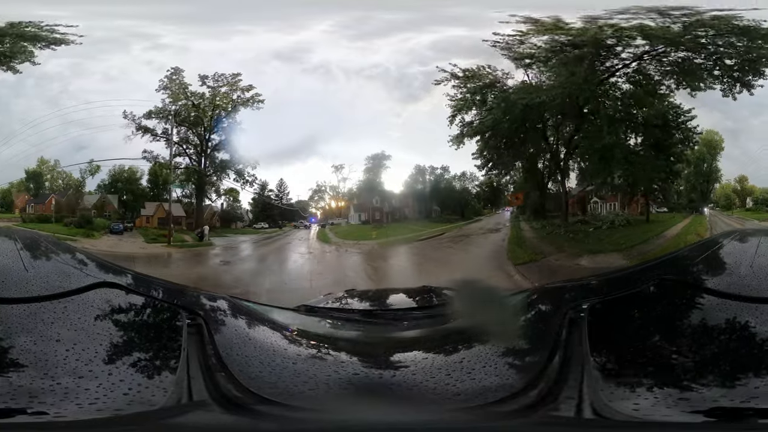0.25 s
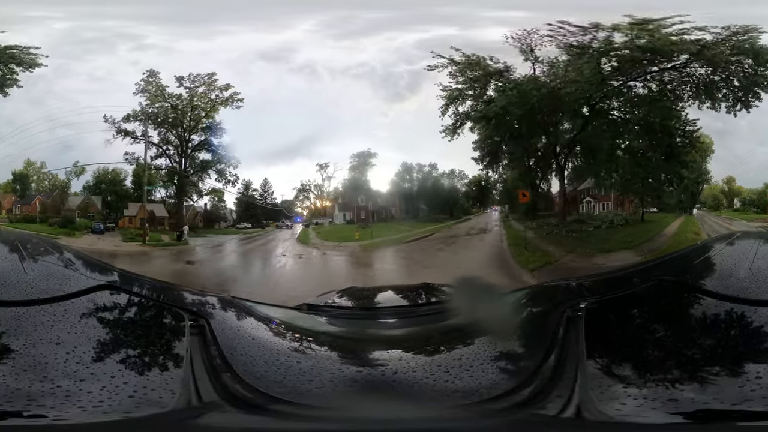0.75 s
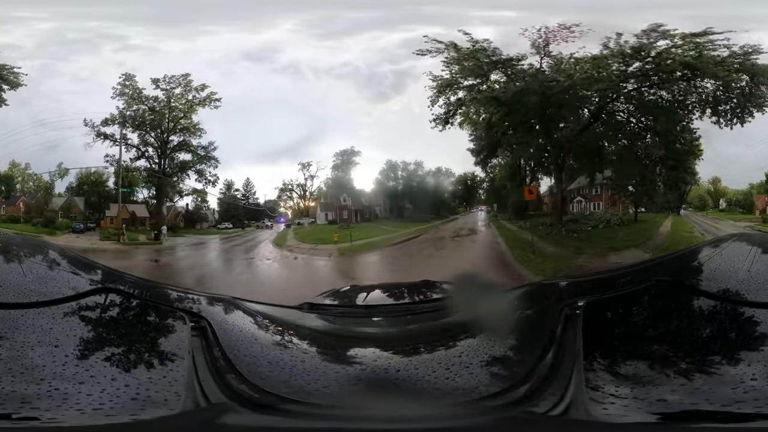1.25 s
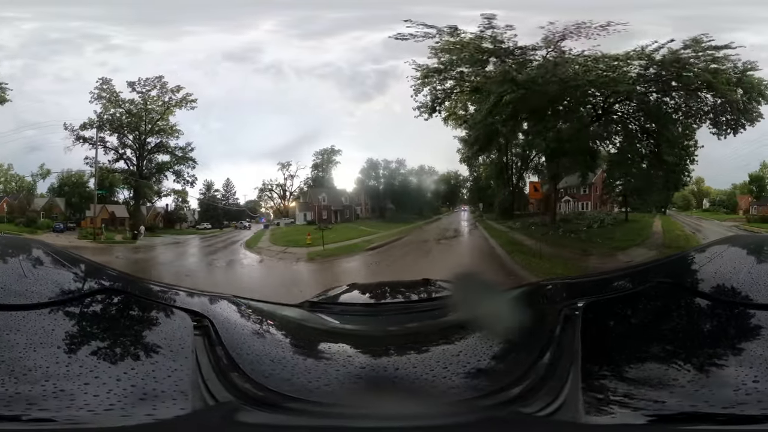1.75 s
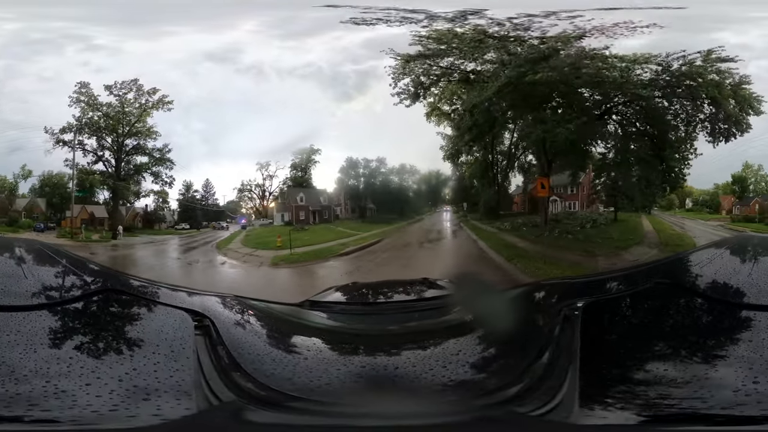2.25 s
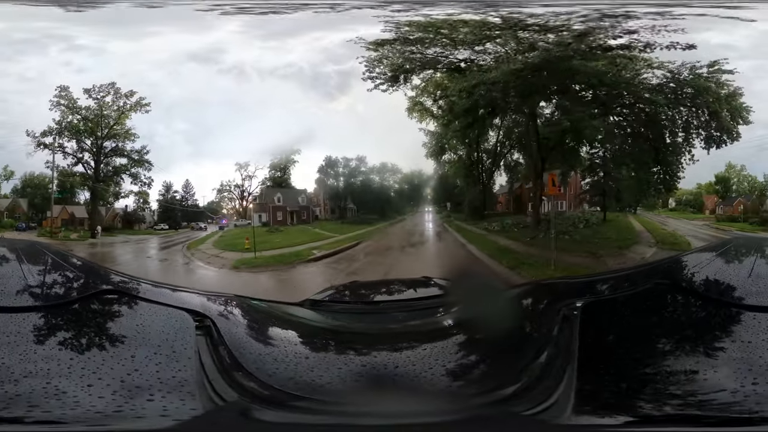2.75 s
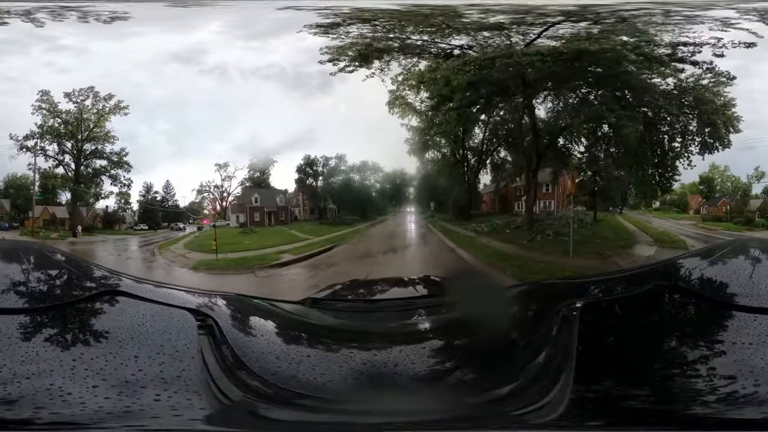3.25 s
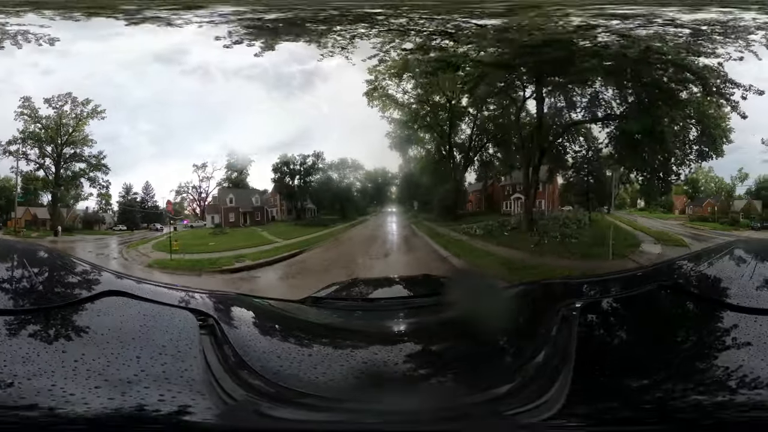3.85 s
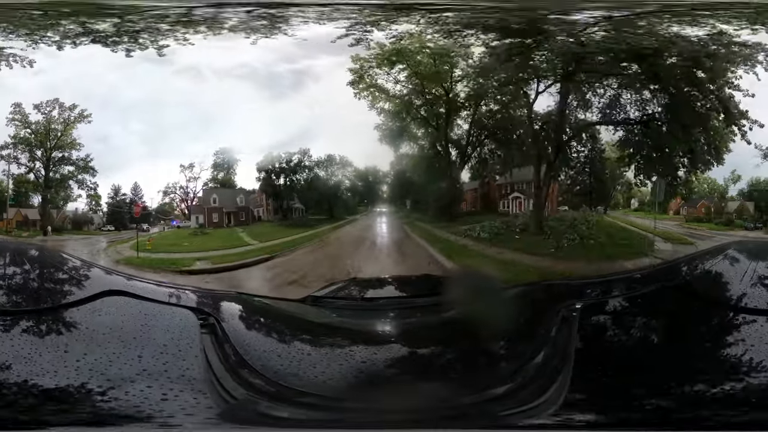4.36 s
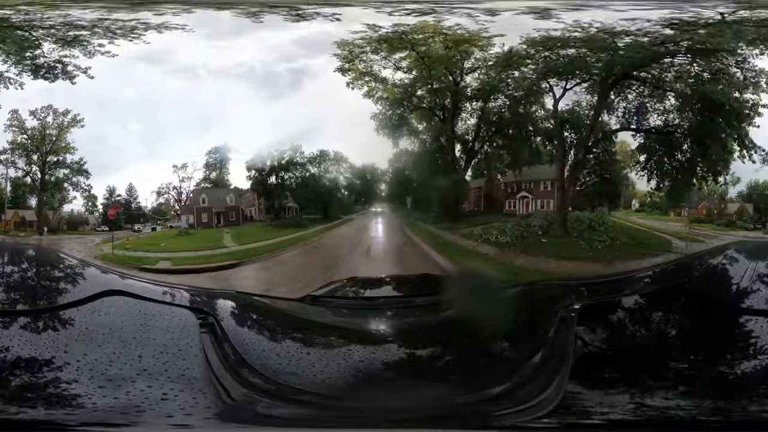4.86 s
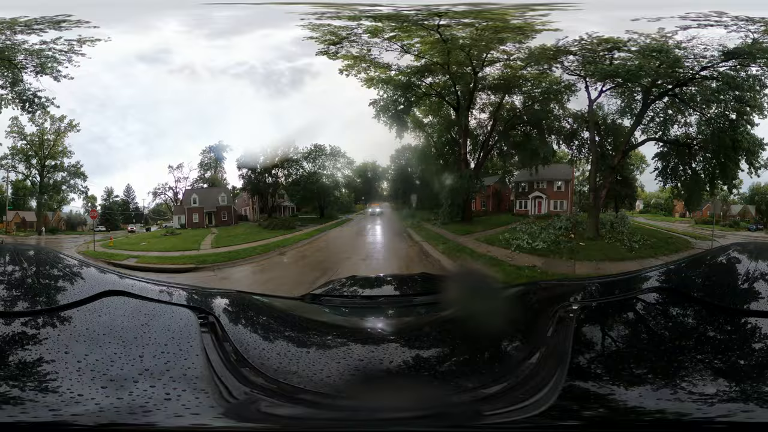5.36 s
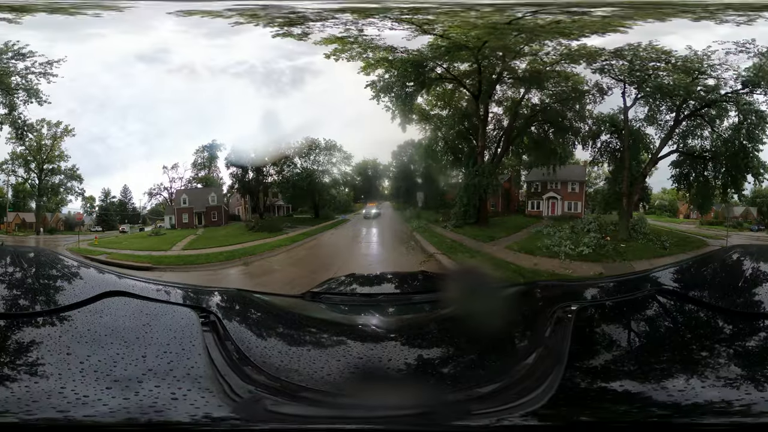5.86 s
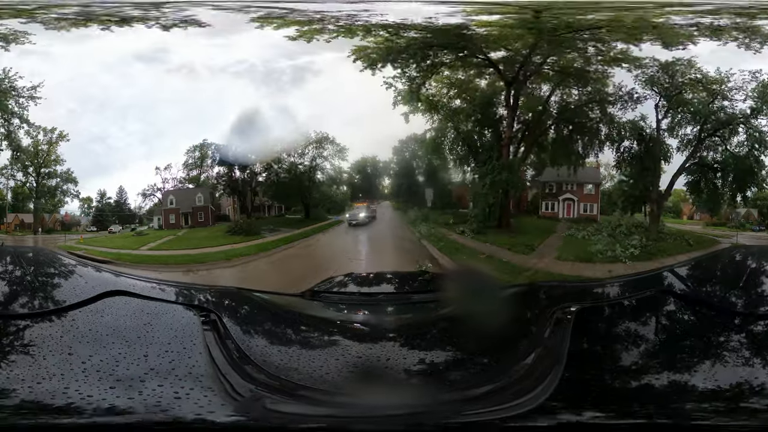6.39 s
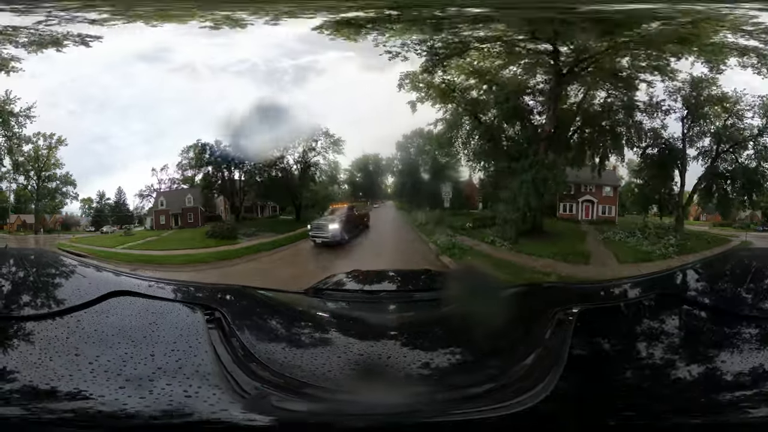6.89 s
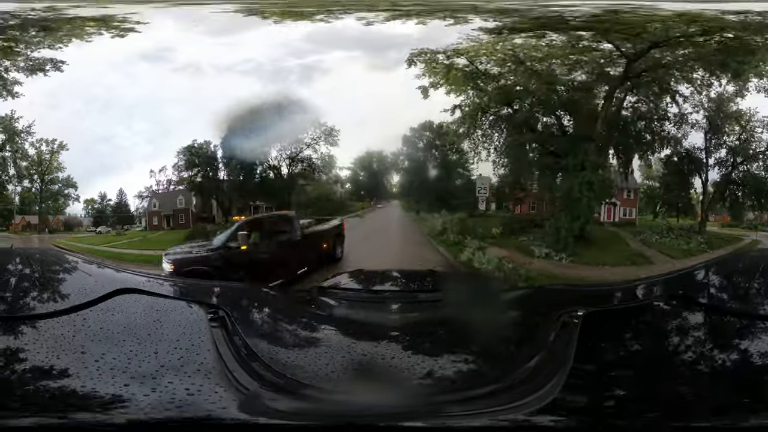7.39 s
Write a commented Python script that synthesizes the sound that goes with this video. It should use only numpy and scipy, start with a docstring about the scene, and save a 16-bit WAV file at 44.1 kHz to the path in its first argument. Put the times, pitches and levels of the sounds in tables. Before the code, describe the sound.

A microphone outside a car picks up lumpy low wind, tire rumble and fine wet hiss. Rounding a corner, the car hits bumps: fittings clank, the body thuds, booms and rattles, and drops tick nearby. The engine then pulls away with a low climbing drone, a faint squeak and another knock follow, puddles swish, and finally an oncoming pickup closes in with tread roar, exhaust growl and a surge of spray.

```python
"""A microphone rides on the outside of a car as it rounds a corner and speeds up along a wet street.
At the corner fittings clank, drops tick close by on the housing and bumps thud, boom and rattle the body;
an oncoming pickup's swish comes up from afar. The engine then pulls away, trim squeaks and puddles splash;
near the end the pickup is close, with tread roar, exhaust and spray. Throughout, wind buffets the port
over tyre rumble, hiss and spray: shaped noise; blows ring decaying modes, and engines are summed sines."""
import sys
import numpy as np
from scipy import signal
from scipy.fft import rfft, irfft, next_fast_len
from scipy.io import wavfile
from scipy.ndimage import uniform_filter1d

SR = 44100
rng = np.random.default_rng(int(sys.argv[2]) if len(sys.argv) > 2 else 0)


def wav_out(sig):
    """Save sig, one row per channel (or a flat mono array), as 16-bit PCM at SR to the path in sys.argv[1]."""
    wavfile.write(sys.argv[1], SR, np.round(np.clip(np.atleast_2d(sig).T, -1, 1) * 32767).astype(np.int16))


N = 336483
T = np.arange(N) / SR   # time [s]


def from_db(db):
    """Decibels to gain."""
    return 10 ** (np.asarray(db) / 20)


def rms_one(x):
    """Scale to unit power."""
    return x / np.sqrt(np.mean(x ** 2) + 1e-20)


def in_time(rows):
    """Each column of a curve at every sample."""
    s, *columns = np.transpose(rows)
    return [np.interp(T, s, c) for c in columns]


def colour(x, shape):
    """Give a steady signal a spectrum, cut by 90 dB outside its ends; unit power."""
    hz, db = np.transpose(shape)
    size = next_fast_len(N)
    f = np.maximum(np.fft.rfftfreq(size, 1 / SR), 1)
    gain = from_db(np.interp(np.log(f), np.log(hz), db, left=-90, right=-90))
    return rms_one(irfft(rfft(x, size) * gain, size)[:N])


def noise(shape):
    """Coloured noise of unit power."""
    return colour(rng.standard_normal(N), shape)


def drift(rate):
    """Random wander of unit power, with `rate` new values a second joined by straight lines."""
    knots = rng.standard_normal(4096)
    return rms_one(np.interp(T * rate, np.arange(len(knots)), knots))


def steady(x, span_s):
    """Hold the power of a noise even over spans of the given length."""
    return x / np.sqrt(uniform_filter1d(x ** 2, max(int(span_s * SR), 2)) + 1e-9)


def dull(x, hz):
    """Second-order low-pass."""
    sos = signal.butter(2, min(hz, .45 * SR), fs=SR, output="sos")
    return signal.sosfilt(sos, x + 1e-18)


def band(x, hz, width):
    """A band of a signal, through two resonators in a row; unit power."""
    peak = signal.iirpeak(hz, hz / width, fs=SR)
    return rms_one(signal.lfilter(*peak, signal.lfilter(*peak, x)))


def ring(x, hz, t60):
    """A unit click sets a decaying sine of initial height 1 ringing."""
    r = np.exp(-np.log(1000) / (t60 * SR))
    w = 2 * np.pi * hz / SR
    return signal.lfilter([0, np.sin(w)], [1, -2 * r * np.cos(w), r * r], x + 1e-18)


def resonate(x, peaks):
    """Lift or lower narrow bands."""
    for hz, width, db in peaks:
        x = x + (from_db(db) - 1) * signal.lfilter(*signal.iirpeak(hz, hz / width, fs=SR), x)
    return x


def click(s):
    """A single unit sample at s."""
    return np.arange(N) == round(s * SR)


def fade(s, t60):
    """An envelope that jumps to 1 at s and dies away."""
    return (T >= s) * np.exp(-np.log(1000) * np.clip((T - s) / t60, 0, 10))


def rise(s, rise_s):
    """An envelope that climbs from 0 at s to 1."""
    return np.clip((T - s) / rise_s, 0, 1)


def burst(s, rise_s, t60):
    """An envelope that climbs from s, then dies away."""
    return rise(s, rise_s) * np.exp(-np.log(1000) * np.clip((T - s - rise_s) / t60, 0, 10))


def swell(s, half_length):
    """A bell-shaped envelope that peaks at s."""
    return np.exp(-.5 * ((T - s) / half_length) ** 2)


def swells_db(rows):
    """Sum of passing lifts or dips in level."""
    return sum(db * swell(s, half_length) for s, db, half_length in rows)


def droplets(per_s, size_db):
    """Clicks of uneven size at random moments; unit power."""
    sizes = from_db(size_db * np.minimum(rng.exponential(1, N), 5)) * rng.choice([-1, 1], N)
    return rms_one(sizes * (rng.random(N) < per_s / SR))


def drone(hz, orders, waver_db, jitter):
    """A low tone of wandering pitch whose overtones each flutter on their own."""
    phase = 2 * np.pi * (rng.random() + np.cumsum(hz * (1 + jitter * drift(22.01))) / SR)
    tones = sum(from_db(db + waver_db * drift(16)) * np.sin(k * phase) for k, db in orders)
    return np.sqrt(2) * tones


# the car rolls round the corner, then gathers pace: (time [s], share of reference speed)
CAR_SPEED = [(0, 0.44), (1.7, 0.51), (3.1, 0.62), (4.2, 0.67), (5.3, 0.84), (7.63, 0.94)]


def speed_db(law):
    """Level of a sound that grows with the car's speed."""
    reference_db, doubling_db = law
    speed, = in_time(CAR_SPEED)
    return reference_db + doubling_db * np.log2(np.maximum(speed, 1e-2))


# faint squeaks: (time [s], level [dB], pitch [Hz], width [Hz], t60 [s])
TRIM_SQUEAKS = [(2.745, -52, 2880, 90, 1.3), (6.051, -62, 12100, 453, 0.75)]


def squeaks():
    """Trim rubs in thin, fading squeaks: narrow bands of noise."""
    rub = rng.standard_normal(N)
    out = np.zeros(N)
    for s, db, hz, width, t60 in TRIM_SQUEAKS:
        squeak = steady(band(rub, hz, width), span_s=.03)
        out += from_db(db) * fade(s, t60) * squeak
    return out


# approach: (time [s], swish level [dB], first notch of the road reflection [Hz], tread roar level [dB])
TRUCK_APPROACH = [(1.5, -65, 740, -84), (3.5, -43.5, 756, -90), (5.2, -39, 766, -70),
                  (5.9, -37.5, 880, -79), (6.25, -38.5, 1010, -55), (6.55, -36, 1150, -46),
                  (6.8, -36, 1420, -38), (6.98, -37.5, 1800, -35.5), (7.3, -42, 3140, -34.5),
                  (7.63, -37.5, 4230, -38)]
# spectra of its swish and its roar: (frequency [Hz], relative density [dB per Hz])
TRUCK_SWISH_SPECTRUM = [(150, 9), (400, 2.5), (800, -1.5), (1100, 2), (1450, 2.5), (2000, 0.5), (3000, -10),
                        (4000, -11), (5500, -21.5), (9000, -50), (13000, -60)]
TRUCK_ROAR_SPECTRUM = [(200, 2), (400, -6.5), (600, -1.5), (850, -3), (1200, -2.5), (1500, -7.5),
                       (2500, -10), (5000, -35)]
# its exhaust drops in pitch as it passes: (time [s], firing rate [Hz], level [dB])
TRUCK_FIRING = [(6.6, 76, -51), (7.05, 71.94, -28.5), (7.3, 63.04, -27.5), (7.63, 58.5, -28)]
# overtones of that exhaust: (multiple of the firing rate, relative level [dB])
TRUCK_ORDERS = [(1, -1.5), (2, -9.5), (2.5, -10), (3, -13)]


def truck(reflection=0.86, rough_db=0.1):
    """Its swish also arrives off the wet road; the lag shrinks as it nears, so the notches sweep up."""
    swish_db, notch_hz, roar_db = in_time(TRUCK_APPROACH)
    direct = noise(TRUCK_SWISH_SPECTRUM)
    # a lag of half a period cancels the first notch
    mirrored = np.interp(T - .5 / notch_hz, T, direct)
    swish = from_db(swish_db) * rms_one(direct + reflection * mirrored)
    # the tread's own roar and the exhaust stand out only close by
    roar = from_db(roar_db + rough_db * drift(45)) * noise(TRUCK_ROAR_SPECTRUM)
    exhaust_hz, exhaust_db = in_time(TRUCK_FIRING)
    exhaust = from_db(exhaust_db) * drone(exhaust_hz, TRUCK_ORDERS, waver_db=2.5, jitter=0.0196)
    return swish + roar + exhaust


# spray of the car: (level at reference speed [dB], gain per doubling of speed [dB])
SPRAY_BY_SPEED = (-44, 6.7)
# passing swells of its hiss, the last as the pickup nears: (time [s], lift [dB], half length [s])
SPRAY_SWELLS = [(2.1, 2, 0.19), (5.09, 6, 0.22), (5.856, 3.5, 0.23)]
# the car's own hiss dips, then gives way as the pickup comes near:
#   (time [s], tread change [dB], spray change [dB], half length [s])
HISS_DIPS = [(2.562, -1.5, -3, 0.11), (6.65, -6.5, -2.5, 0.54)]
# the pickup's spray comes into range, then surges as it draws level: (time [s], level [dB])
TRUCK_SPRAY_LEVEL = [(5.9, -55), (6.6, -47.5), (6.95, -44.5), (7.01, -37.5), (7.1, -37.5), (7.2, -39.5),
                     (7.63, -39.5)]
# spectra of the two sprays: (frequency [Hz], relative density [dB per Hz])
TRUCK_SPRAY_SPECTRUM = [(1200, -21), (2200, -2), (3300, 1), (4500, -1.5), (5600, 1), (7000, -5.5),
                        (9000, -13), (11500, -30), (15000, -36)]
SPRAY_SPECTRUM = [(800, -22), (1800, 0), (2800, 3.5), (3600, 1), (4500, -3), (6000, 0), (7500, -6),
                  (9000, -12.5), (10500, -22), (11500, -30), (15000, -38.5)]


def spray(per_s=2500, size_db=3.5, grain=0.67, surge_db=.5):
    """Fine mist from both vehicles hisses, with countless droplets of uneven size in it."""
    car_db = speed_db(SPRAY_BY_SPEED) + swells_db(SPRAY_SWELLS)
    car_db += swells_db((s, db, half_length) for s, _, db, half_length in HISS_DIPS)
    truck_db, = in_time(TRUCK_SPRAY_LEVEL)
    out = np.zeros(N)
    for db, spectrum in ((car_db, SPRAY_SPECTRUM), (truck_db, TRUCK_SPRAY_SPECTRUM)):
        water = colour(rng.standard_normal(N) + grain * droplets(per_s, size_db), spectrum)
        out += from_db(db + surge_db * drift(25)) * water
    return out


# tyres cutting through puddles: (time [s], level [dB], half length [s], band centre [Hz])
PUDDLE_SPLASHES = [(4.703, -41.5, 0.037, 4420), (4.864, -46, 0.09, 3698), (5.038, -40.5, 0.025, 3195),
                   (5.156, -36.5, 0.05, 3700), (5.31, -40, 0.074, 3580)]


def puddles(sharpness=0.43, churn_db=2.0, grain=1.6):
    """Standing water swishes under a tyre in a churning swell full of flung droplets."""
    splash = rng.standard_normal(N) + grain * droplets(per_s=2100, size_db=2.5)
    water = colour(splash, SPRAY_SPECTRUM) * from_db(churn_db * drift(120))
    out = np.zeros(N)
    for s, db, half_length, hz in PUDDLE_SPLASHES:
        out += from_db(db) * swell(s, half_length) * band(water, hz, hz / sharpness)
    return out


# drops on the microphone housing: (time [s], level before the common trim [dB], band centre [Hz])
HOUSING_DROPS = [(0.583, -26.5, 5070), (0.596, -32, 5400), (0.622, -31, 6000), (0.6284, -23, 4800),
                 (0.637, -31, 7200), (1.039, -31, 4800), (1.212, -29, 2100), (2.112, -25, 6500),
                 (2.123, -31, 3500), (2.24, -30, 6000), (2.296, -31, 5000), (2.351, -33, 4000),
                 (2.695, -33, 7600), (2.8365, -22, 7500), (3.919, -22.5, 4060), (5.7152, -27, 5800),
                 (5.82, -19, 5260), (6.4746, -23.5, 4514), (6.827, -24, 5410)]


def drops(t60=0.025, sharpness=1.3, trim_db=-11, rise_s=0.0012):
    """Each drop splats as a brief, broad tick around its own pitch."""
    out, splat = np.zeros(N), rng.standard_normal(N)
    for s, db, hz in HOUSING_DROPS:
        tick = steady(band(splat, hz, hz / sharpness), span_s=0.0015)
        out += from_db(db + trim_db) * burst(s, rise_s, t60) * tick
    return dull(dull(out, hz=8950), hz=9500)


# engine pulling away: (time [s], firing rate [Hz], level [dB])
ENGINE_PULL = [(2.65, 46, -47), (2.9, 52.98, -26), (3.2, 59.04, -23.5), (3.6, 63.35, -24),
               (3.95, 69.58, -26.5), (4.8, 76.35, -27), (5.15, 82.15, -37), (5.7, 80.16, -35.5),
               (6.2, 79, -28), (6.6, 80.16, -34), (7.63, 79, -36)]
# its overtones: (multiple of the firing rate, relative level [dB])
FIRING_ORDERS = [(1, -0.5), (1.5, -13), (2, -18), (3, -18), (4, -21)]


def engine(intake_db=-18, intake_hz=385, intake_width_hz=130):
    """The exhaust drones and the intake growls as the throttle opens; both ease off after the climb."""
    hz, db = in_time(ENGINE_PULL)
    exhaust = drone(hz, FIRING_ORDERS, waver_db=0.7, jitter=0.0049)
    # air rushes in only on the positive half of the exhaust wave
    gulps = np.maximum(exhaust, 0)
    intake = rms_one(gulps * band(rng.standard_normal(N), intake_hz, intake_width_hz))
    return from_db(db) * (exhaust + from_db(intake_db) * intake)


# metal fittings clanking: (time [s], clatter level [dB], clatter length [s], low-pass [Hz],
#   wash relative to clatter [dB], wash t60 [s], ring strike relative to clatter [dB])
FITTING_CLANKS = [(0.01, -27.5, 0.0031, 11000, -12, .15, -42), (0.028, -35.5, 0.002, 10100, -15, 0.11, -32),
                  (0.926, -22, 0.005, 1700, -20, .1, -29), (0.9337, -25.5, 0.0084, 4600, -7, 0.4, -23),
                  (0.964, -43, 0.0037, 11000, -5, 0.54, -33), (2.836, -38.5, 0.003, 10000, -8, 1, -28),
                  (3.441, -34, 0.0068, 8950, -14, 0.32, -33), (3.446, -27, 0.0071, 9500, -10, 0.7, -20),
                  (3.464, -33, 0.0051, 2200, -19, 0.26, -33), (3.545, -46, 0.009, 8000, -4, .2, -7)]
# ringing modes of the fittings: (frequency [Hz], relative level [dB], t60 [s])
FITTING_MODES = [(1757, 18, 0.085), (2410, 1, .09), (3670, 11, 0.06), (4320, -3, 0.1), (5300, -8, 0.2),
                 (6120, 7, 0.3), (6930, -4, 0.15), (7100, -2, 0.27), (7900, -5, 0.2)]
# spectrum of the clatter: (frequency [Hz], relative density [dB per Hz])
CLANK_SPECTRUM = [(300, 8), (900, 2), (2000, 0.5), (2700, 1), (3700, -4), (4700, -2), (6500, 1.5),
                  (9300, -2.5), (11500, -15), (15000, -15)]


def clanks(rise_s=0.0022, stop_t60=0.0078, shimmer_db=2.0, ring_width_hz=110, lift_db=5):
    """A short noise burst of contacts, then ringing metal and a fading wash lifted at the same modes."""
    mode_peaks = [(hz, ring_width_hz, lift_db) for hz, _, _ in FITTING_MODES]
    clatter = rms_one(resonate(noise(CLANK_SPECTRUM), mode_peaks))
    clatter *= from_db(shimmer_db * drift(150))
    out, strikes = np.zeros(N), np.zeros(N)
    for s, db, length, hz, wash_db, wash_t60, ring_db in FITTING_CLANKS:
        contact = np.maximum((T >= s) & (T < s + length), fade(s + length, stop_t60))
        wash = from_db(wash_db) * fade(s, wash_t60)
        envelope = rise(s, rise_s) * np.maximum(contact, wash)
        out += dull(from_db(db) * envelope * clatter, hz)
        strikes += dull(from_db(db + ring_db) * click(s), hz)
    return out + sum(from_db(db) * ring(strikes, hz, t60) for hz, db, t60 in FITTING_MODES)


# jolts that rock the whole body, heard in rattle and boom:
#   (time [s], boom level [dB], boom pitch [Hz], boom t60 [s], rattle level [dB])
BODY_JOLTS = [(0.932, -16.5, 88.04, 0.28, -29), (1.068, -17.5, 93, .14, -37),
              (1.114, -21.5, 89.8, 0.29, -52), (1.955, -24, 110.3, 0.48, -26.5),
              (2.085, -19, 103.6, 0.49, -28), (2.123, -10, 100.1, 0.049, -38),
              (2.213, -16, 99.6, 0.18, -30), (2.272, -18, 95, 0.19, -31.5),
              (2.347, -15.5, 88.5, 0.3, -33.5), (2.44, -17.5, 86.9, 0.39, -54), (2.495, -18, 85, 0.18, -55)]
# spectrum of the rattle: (frequency [Hz], relative density [dB per Hz])
RATTLE_SPECTRUM = [(100, 10), (180, 12.5), (320, 5.5), (450, 4), (600, -4), (760, -7.5), (930, -10),
                   (1200, -8), (1600, -17.5), (3500, -24.5), (6000, -36)]
# resonances of the loose parts: (frequency [Hz], width [Hz], lift [dB])
LOOSE_PART_PEAKS = [(310, 50, 1.5), (545, 40, 0), (740, 78, 7), (1150, 67, 3.5), (1470, 50, 9.5),
                    (1800, 117, 4)]


def rattle(rise_s=0.0085, t60=0.71, shake_db=2.5, shakes_per_s=120):
    """Each jolt sets loose parts chattering in a run of small, uneven contacts."""
    power = sum((from_db(db) * burst(s, rise_s, t60)) ** 2 for s, *_, db in BODY_JOLTS)
    contacts = colour(droplets(per_s=1500, size_db=3.0), RATTLE_SPECTRUM)
    contacts = steady(resonate(contacts, LOOSE_PART_PEAKS), span_s=0.023)
    return np.sqrt(power) * rms_one(contacts * from_db(shake_db * drift(shakes_per_s)))


# overtones of the body boom: (multiple of its pitch, relative level [dB])
BODY_BOOM_ORDERS = [(1, -0.5), (2, -20)]


def boom(rise_s=0.013, sag_hz_per_s=9.8):
    """After each jolt the body booms, sagging in pitch as it dies away."""
    out = np.zeros(N)
    for s, db, hz, t60, _ in BODY_JOLTS:
        pitch = hz - sag_hz_per_s * np.clip(T - s, 0, t60)
        tone = drone(pitch, BODY_BOOM_ORDERS, waver_db=2.5, jitter=0.0624)
        out += from_db(db) * burst(s, rise_s, t60) * tone
    return out


# suspension blows: (time [s], blow strength before the trims [dB], low-pass [Hz],
#   knock level [dB], knock pitch [Hz])
SUSPENSION_BLOWS = [(0.814, -19, 380, -33, 330), (0.927, -14, 650, -7.5, 323),
                    (0.9408, -10.5, 380, -16, 558), (0.963, -23, 550, -31, 544),
                    (0.976, -26, 700, -33, 680), (0.988, -30, 600, -34, 500), (1.029, -22, 500, -34, 563),
                    (1.072, -25, 400, -29, 527), (1.958, -19, 850, -22.5, 694),
                    (1.97, -21.5, 350, -31, 330), (1.985, -19, 750, -27, 550),
                    (2.014, -16.5, 900, -24, 726), (2.04, -28, 900, -38, 560), (2.078, -22, 900, -36, 450),
                    (2.089, -16.5, 606, -22, 312), (2.108, -29, 1900, -34, 630),
                    (2.126, -27, 1500, -33, 1150), (2.193, -32, 1200, -34, 1040),
                    (2.226, -33, 1200, -48, 520), (2.274, -31, 900, -37, 780),
                    (2.294, -29, 1400, -34, 1150), (2.319, -30, 1200, -37, 780),
                    (2.367, -22, 800, -34, 644), (2.388, -27, 900, -42, 790), (2.426, -24, 500, -29, 340),
                    (3.454, -19.5, 1200, -31, 720), (3.466, -27, 1100, -32, 443)]
# body panel modes: (frequency [Hz], relative level [dB], t60 [s])
PANEL_MODES = [(98.2, -1, 0.55), (135.4, -10.5, 0.48), (186, -3, 0.11), (242, -4, 0.25), (303, 1, 0.066),
               (334, -10.5, 0.093), (471, -10, 0.1), (553, -18.5, 0.35), (748, -6, 0.092),
               (850, -16, 0.043), (1100, -7.5, 0.037), (1500, -24, 0.021)]
# spectrum of the crunch: (frequency [Hz], relative density [dB per Hz])
CRUNCH_SPECTRUM = [(90, 4), (300, -3), (750, 4), (950, 7), (1300, 0), (2000, -15), (4000, -28)]


def thuds(crunch_db=-14, ring_db=-4.5, crunch_t60=.055, knock_rise_s=.0045, knock_t60=.03):
    """Each blow knocks at the pitch of the part it hits, rings the panels and shakes loose a dull crunch."""
    blows, crunch, knocks = np.zeros(N), np.zeros(N), np.zeros(N)
    grit = steady(noise(CRUNCH_SPECTRUM), span_s=0.01)
    for s, db, hz, knock_db, knock_hz in SUSPENSION_BLOWS:
        blows += dull(from_db(db) * click(s), hz)
        crunch += dull(from_db(db) * fade(s, crunch_t60) * grit, hz)
        knock = np.sin(2 * np.pi * knock_hz * (T - s))
        knocks += from_db(knock_db) * burst(s, knock_rise_s, knock_t60) * knock
    panels = np.zeros(N)
    for k, (hz, db, t60) in enumerate(PANEL_MODES):
        # neighbouring modes ring in opposite polarity
        panels += (-1) ** k * from_db(db) * ring(blows, hz, t60)
    return from_db(ring_db) * panels + from_db(crunch_db) * crunch - knocks


# rumble, its extra upper part, and tread: (level at reference speed [dB], gain per doubling of speed [dB])
RUMBLE_BY_SPEED = (-26.5, 6.08)
RUMBLE_TOP_BY_SPEED = (0.73, 3.6)   # added to the rumble's own law above the split
TREAD_BY_SPEED = (-44.5, 1.54)
# coarser asphalt swells the rumble: (time [s], lift [dB], half length [s])
COARSE_ROAD = [(3.165, 1, 0.05), (3.465, 2.5, 0.06), (4.45, 2, 0.25), (5.15, 2.5, 0.092), (5.417, 4, 0.058),
               (5.7, 1, 0.089), (6.66, 1.5, 0.06), (7.4, 0.5, 0.12)]
# spectra of rumble and tread hiss: (frequency [Hz], relative density [dB per Hz])
RUMBLE_SPECTRUM = [(40, 14), (90, 4.5), (130, 6.5), (180, 1.5), (230, -2), (310, -5.5), (420, -7.5),
                   (550, -11), (750, -14.5), (1100, -21), (2500, -47)]
TREAD_SPECTRUM = [(300, 8.5), (600, -19), (900, -2), (1080, 2), (1270, 5), (1600, 1), (2000, -0.5),
                  (2600, -6), (3500, -27), (6000, -57)]
# tyre cavity and tread resonances: (frequency [Hz], width [Hz], lift [dB])
TYRE_PEAKS = [(184.7, 8.7, 3), (231.2, 4.6, 9.5), (275.5, 22, 4), (318, 10, 4), (411.5, 12.4, 4)]


def tyres(rough_db=1.07, flutter_db=1.3, split_hz=264):
    """Rough asphalt shakes the tyres, louder and brighter with speed; the tread hisses as it pumps air."""
    rumble = steady(resonate(noise(RUMBLE_SPECTRUM), TYRE_PEAKS), span_s=0.25)
    deep = signal.sosfiltfilt(signal.butter(2, split_hz, fs=SR, output="sos"), rumble)
    rumble = deep + from_db(speed_db(RUMBLE_TOP_BY_SPEED)) * (rumble - deep)
    rumble_db = speed_db(RUMBLE_BY_SPEED) + swells_db(COARSE_ROAD) + rough_db * drift(40)
    hiss_db = speed_db(TREAD_BY_SPEED) + flutter_db * drift(30)
    hiss_db += swells_db((s, db, half_length) for s, db, _, half_length in HISS_DIPS)
    return from_db(rumble_db) * rumble + from_db(hiss_db) * noise(TREAD_SPECTRUM)


# wind: (level at reference speed [dB], gain per doubling of speed [dB])
WIND_BY_SPEED = (-18.5, 12.3)
# gusts at the microphone port: (time [s], lift [dB], half length [s])
PORT_GUSTS = [(0.2, 1.5, 0.18), (0.953, 5, 0.03), (1.07, 4, 0.055), (2.3, 1.5, 0.09), (6.012, 5, 0.042),
              (6.204, 3.5, 0.09), (6.676, 2, 0.082), (7.06, 1.5, 0.062), (7.55, 2.5, 0.077)]
# spectrum of the wind: (frequency [Hz], relative density [dB per Hz])
WIND_SPECTRUM = [(8, 3.5), (20, -0.5), (30, 2.5), (50, -2), (75, -3.5), (95, -3), (130, -18), (200, -21.5),
                 (400, -35.5), (1000, -74)]


def wind(lump_db=1.2, lumps_per_s=12):
    """Eddies press on the port as a deep, lumpy noise that grows with speed and in gusts."""
    buffet_db = speed_db(WIND_BY_SPEED) + swells_db(PORT_GUSTS) + lump_db * drift(lumps_per_s)
    return from_db(buffet_db) * steady(noise(WIND_SPECTRUM), span_s=0.118)


def scene():
    """Everything meets at one microphone on the outside of the car."""
    bumps = thuds() + rattle() + clanks() + boom()
    water = spray() + puddles() + drops()
    return (wind() + tyres() + engine() + truck() + bumps + water + squeaks())[None]


# microphone housing resonances: (frequency [Hz], width [Hz], lift [dB])
HOUSING_PEAKS = [(900, 35, -1.5), (1086, 99, 1), (4700, 370, -2), (5040, 450, 1.5), (5900, 430, 2),
                 (6410, 1370, -4), (8360, 150, 5.5)]


def record(dry, cutoff_hz=15700):
    """The microphone housing resonates in the mids and treble; a steep low-pass cuts the top."""
    top_cut = signal.cheby2(12, 70, cutoff_hz, fs=SR, output="sos")
    return signal.sosfilt(top_cut, resonate(dry, HOUSING_PEAKS))


dry = scene()
out = record(dry)
wav_out(out)
```